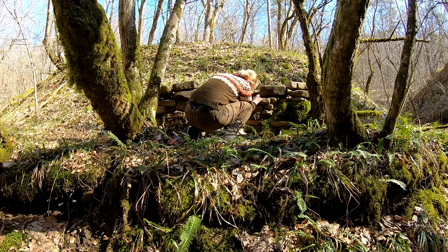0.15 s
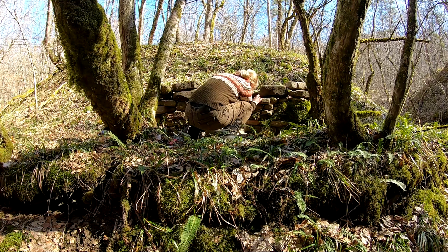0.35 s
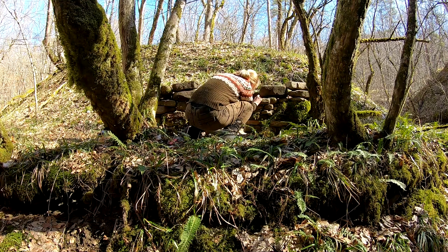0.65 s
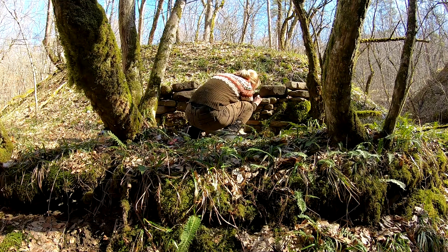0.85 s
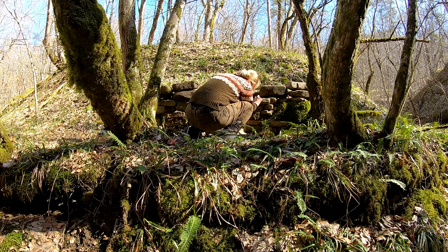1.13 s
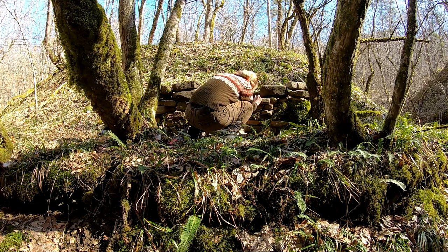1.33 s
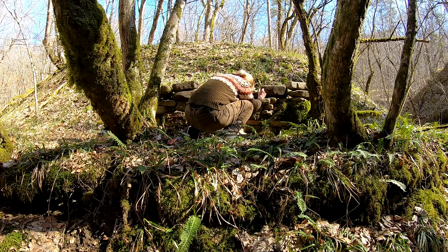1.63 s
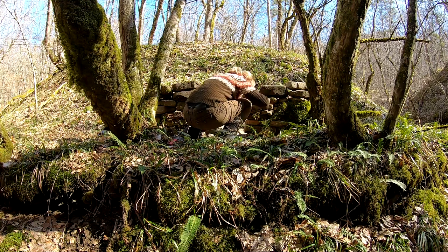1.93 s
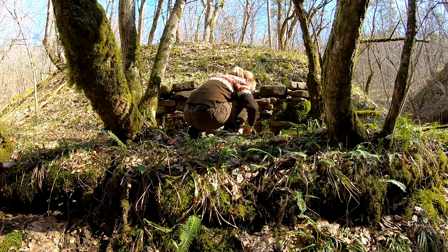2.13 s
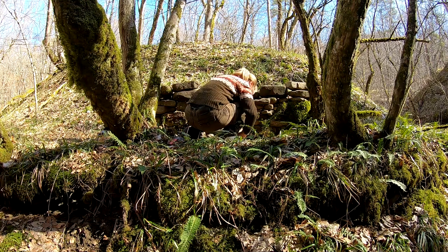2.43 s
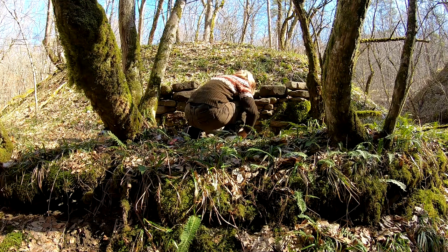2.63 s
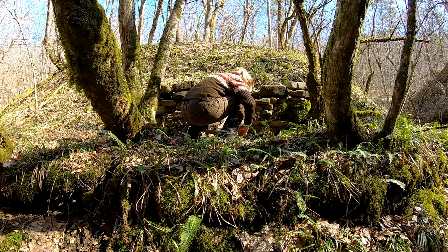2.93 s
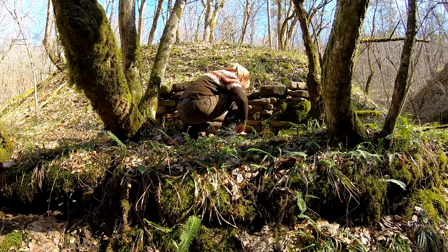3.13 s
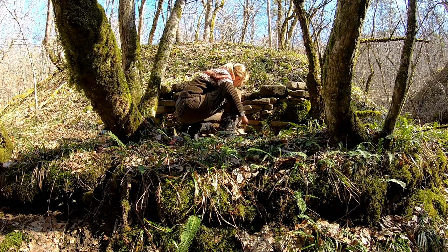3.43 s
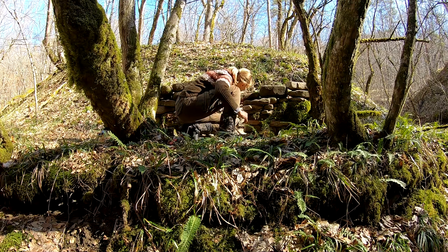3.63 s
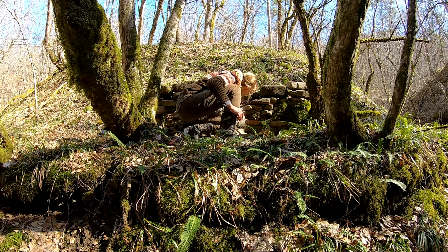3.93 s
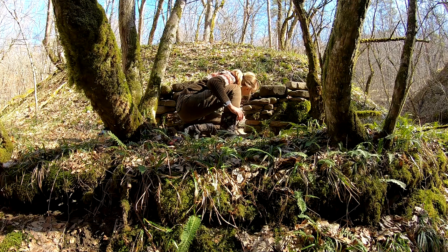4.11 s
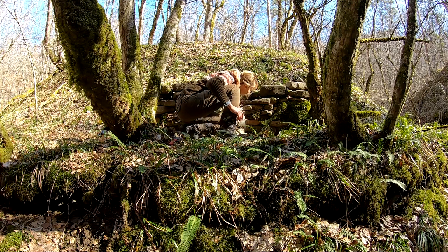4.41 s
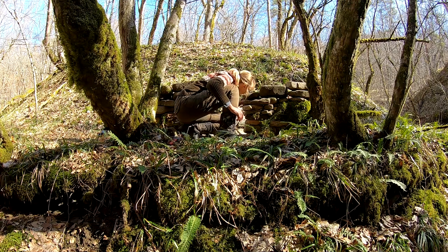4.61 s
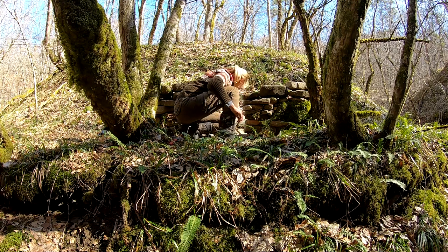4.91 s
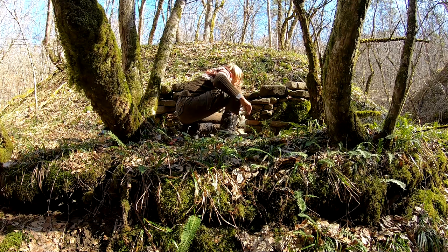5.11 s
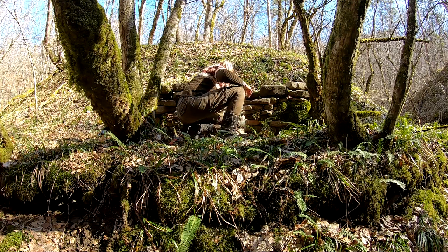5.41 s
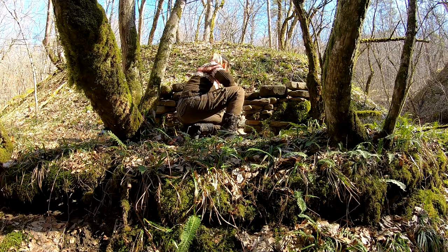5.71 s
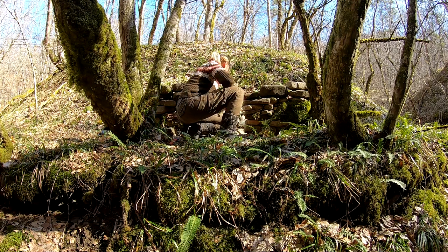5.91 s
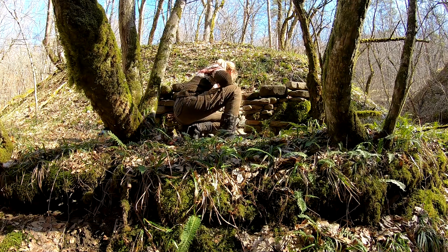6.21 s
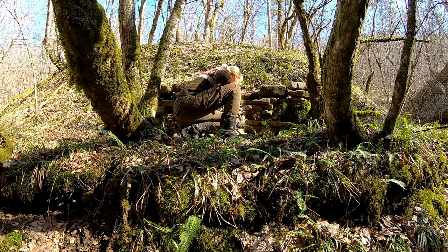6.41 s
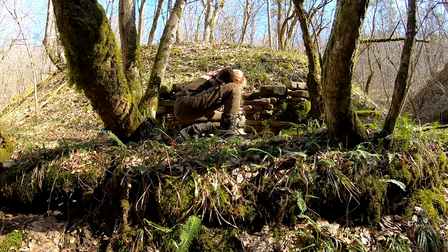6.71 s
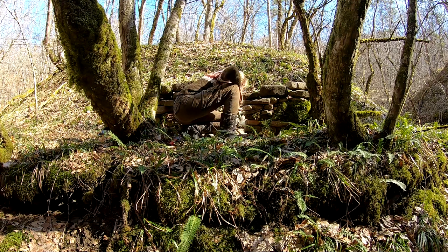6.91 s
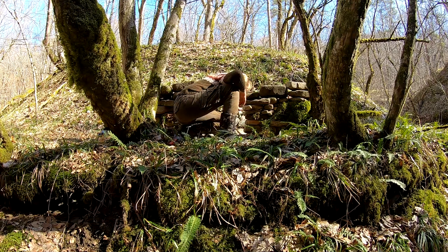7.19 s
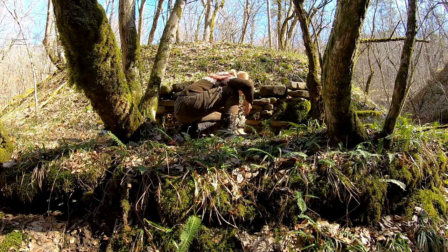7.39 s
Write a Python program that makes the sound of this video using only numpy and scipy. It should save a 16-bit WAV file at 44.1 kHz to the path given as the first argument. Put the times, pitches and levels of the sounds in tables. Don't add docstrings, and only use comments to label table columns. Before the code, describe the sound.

Throughout, a small stream trickles over stones in a wood, close and wide in stereo. Irregular bubbles ring as short bright plinks, drier pops and occasional lower gulps, with fine ticks of droplets, small splashes and a thin fizz of spray rising and falling over a soft distant water wash. Stones and banks give only a very short scatter. A faint low gust touches the microphones near 0.6 s and another near 1.8 s. At 2.2 s a twig snaps, one sharp crack with quick tiny echoes. From 3.1 to 3.5 s a boot drags through dry, crackling leaves. Brisk pops cluster around 3.5 to 3.9 s. Wind thumps begin near 4 s and become frequent, deep and uneven from 4.8 to 6.5 s, shifting between left and right. At 7.2 s a stone settles on moss with a short dull scuff, followed by last low thumps as the water continues.

```python
import sys
import numpy as np
from scipy import signal
from scipy.fft import next_fast_len
from scipy.io import wavfile
from scipy.ndimage import uniform_filter1d

SR = 44100
rng = np.random.default_rng(int(sys.argv[2]) if len(sys.argv) > 2 else 0)


def put_to_file(sound):
    columns = np.atleast_2d(sound).T
    safe = np.clip(columns, -1, 1)
    whole_steps = np.round(safe * 32767)
    wavfile.write(sys.argv[1], SR, whole_steps.astype(np.int16))


def invert_db(x):
    u = np.asarray(x, float) / 20
    return 10 ** u


N = 332955

# [t/s, peak level/dB, f/Hz]
GLUGS = [(0.0289, -35, 3630), (.1397, -39.5, 2080), (.2245, -45.5, 710), (.28, -42.5, 2390),
         (0.4632, -45, 1010), (0.604, -36, 3050), (0.654, -35, 3630), (0.7621, -42.5, 1076),
         (1.0376, -47, 658), (1.272, -38, 3080), (1.663, -40, 2240), (1.717, -43, 1153),
         (1.7859, -43.5, 689), (2.649, -45, 2190), (2.669, -45, 2510), (3.0532, -40.5, 1031),
         (3.7789, -45, 770), (3.881, -44.5, 1190), (4.7787, -43.5, 640), (4.873, -45.5, 1010),
         (5.105, -37.5, 1724), (5.2407, -29, 3025), (5.3688, -39.5, 1760), (5.492, -39.5, 1467),
         (5.5524, -40, 1100), (5.6548, -44, 1018), (5.8225, -44.5, 1300), (6.0297, -37, 3080),
         (6.578, -40, 1350), (7.177, -37.5, 3370)]
# [t/s, peak level/dB, f/Hz]
PLINKS = [(0.094, -36.5, 2610), (0.154, -37.5, 1197), (0.323, -37.5, 3400), (0.4687, -38, 2200),
          (0.591, -38, 2460), (0.728, -40.5, 1194), (.7832, -36, 3650), (0.954, -36, 2800),
          (1.242, -38, 2570), (1.344, -41.5, 1210), (1.3883, -43, 706), (1.391, -36, 1243),
          (1.73, -35, 4190), (2.0686, -34.5, 1070), (2.1636, -35, 3020), (2.3874, -40, 1610),
          (2.753, -45, 930), (2.7747, -37, 1720), (2.918, -43.5, 663), (3.664, -34, 4030),
          (5.082, -30, 2520), (5.19, -41.5, 605), (5.272, -30.5, 4060), (5.941, -39.5, 1073),
          (6.128, -33.5, 2670), (6.357, -39, 3600), (6.706, -37, 2130), (7.0757, -43.5, 916),
          (7.109, -35.5, 3650), (7.271, -37, 2490)]
# [t/s, peak level/dB, f/Hz]
POPS = [(0.0, -38, 1210), (0.2744, -30, 2200), (0.4438, -30.5, 2590), (1.462, -35, 1770),
        (1.4775, -33.5, 2680), (1.4847, -40, 612), (1.6414, -31, 3850), (1.732, -33.5, 2290),
        (1.978, -34.5, 3800), (2.2926, -32.5, 2500), (3.522, -27.5, 1465), (3.53, -31.5, 4160),
        (3.6116, -29, 4030), (3.6467, -25.5, 2800), (3.6814, -32, 3870), (3.8694, -31, 4100),
        (4.1958, -34.5, 2130), (4.638, -32, 3500), (4.8466, -32, 2760), (5.052, -32, 2530),
        (5.3533, -34, 4100), (5.4543, -33.5, 3250), (5.5914, -29.5, 1980), (5.7454, -34, 2800),
        (5.9, -28, 2950), (6.105, -35, 1570), (6.2993, -34.5, 1350), (6.4182, -34, 1610), (7.264, -38, 880),
        (7.4258, -29, 3760)]
# [t/s, peak level/dB, f/Hz]
GULPS = [(.535, -48.5, 696), (0.699, -58.5, 466), (1.3644, -44, 610), (1.5151, -48, 598),
         (1.8862, -52, 488), (2.07, -50, 593), (2.696, -46.5, 640), (3.141, -40, 1072), (3.472, -48, 608),
         (3.53, -49, 592), (4.462, -48, 626), (4.69, -53.5, 627), (4.965, -46, 613), (5.9, -53, 595),
         (5.99, -55, 572), (6.07, -69, 604), (6.742, -46.5, 646), (6.9, -49, 1017)]
# [t/s, peak level/dB, f/Hz]
BLIPS = [(0.1493, -44, 3740), (0.2105, -45, 3320), (0.2135, -46.9, 2720), (0.24, -49.5, 1100),
         (0.6145, -47, 2480), (0.996, -44, 3230), (1.132, -43.5, 3000), (1.1823, -42.5, 2670.0),
         (1.2686, -49, 1421), (1.2908, -47.5, 639), (1.315, -44.5, 1750), (1.4426, -43.5, 3700),
         (1.5947, -44.5, 2400), (1.658, -46, 2800), (1.7595, -45, 2170), (1.7949, -48, 676),
         (1.8142, -44.5, 2860), (2.0874, -43.5, 1670), (2.2184, -44, 1630), (2.791, -46.5, 1204),
         (2.8948, -45.5, 4221), (3.1034, -43.5, 3830.0), (3.4714, -44.5, 1280), (3.5424, -43, 3300),
         (3.6288, -43, 3740), (3.6881, -45.3, 2770), (3.748, -46, 1700), (4.024, -46, 2090),
         (4.031, -42.5, 3420), (4.4765, -44, 2240), (4.567, -46, 3488), (4.8835, -44, 1500),
         (5.3604, -45, 2320), (5.4123, -47.5, 1800), (5.684, -46.2, 2800), (5.735, -46, 1770),
         (5.925, -43.5, 2210), (6.0521, -47, 2260.0), (6.2138, -45.5, 1600), (6.326, -46, 3100),
         (6.401, -47, 1245), (6.885, -47.5, 1026), (7.0741, -45, 2060), (7.138, -46, 2326),
         (7.2551, -45, 3210.0), (7.3146, -47.5, 1760), (7.377, -43.1, 1840), (7.3854, -45, 2550),
         (7.4704, -44.5, 2580), (7.4959, -44.5, 1414), (7.5218, -49.5, 648), (7.522, -47, 1250.0)]
# [t/s, peak level/dB, f/Hz]
PIPS = [(0.196, -43, 1570), (0.2653, -43.5, 1330), (0.3363, -45.5, 1170), (0.3565, -43, 1360),
        (0.433, -42, 1390), (0.5021, -44, 1830), (0.744, -39, 2110.0), (0.9312, -45.5, 1410),
        (1.1037, -40.5, 2540), (1.1364, -44, 1180), (1.5317, -42.5, 2000), (1.547, -41, 2690.0),
        (1.577, -44, 1134), (1.812, -46, 1030.0), (1.9197, -40.5, 2690.0), (2.0508, -41, 3360),
        (2.0577, -42.5, 1850.0), (2.4642, -39, 3760), (2.503, -44.5, 1430), (2.8178, -42.5, 3550),
        (3.03, -39.5, 2690.0), (3.08, -48, 1760), (3.6466, -41, 3700), (3.7817, -41, 2200),
        (3.8311, -40.5, 4000), (4.2151, -41.5, 2210), (4.3137, -46, 1740), (4.3815, -40, 3402),
        (4.447, -40, 3550), (4.4534, -46, 1480), (4.621, -45, 1590.0), (4.716, -43, 1290),
        (4.808, -43, 1290), (4.91, -41, 2050), (5.115, -43, 2260), (5.1908, -44, 1740),
        (5.532, -48.0, 1130), (5.574, -45, 2150), (5.5798, -46, 1430), (5.6968, -42, 2320),
        (5.8792, -48, 744), (6.01, -41, 1350), (6.135, -40.5, 1830), (6.354, -43, 1730), (6.4284, -50, 790),
        (6.7054, -39.5, 2930), (6.7774, -41.5, 1640), (7.1914, -47.5, 718), (7.2, -43, 2600),
        (7.3972, -39, 2100), (7.4029, -45, 1590), (7.4858, -39, 1990), (7.5344, -47, 680)]
# [t/s, peak level/dB, f/Hz]
TICKS = [(0.0066, -45.5, 5280), (0.324, -41.5, 4770), (0.420, -47.5, 7600), (0.521, -44, 4970.0),
         (0.6156, -48, 4460), (1.155, -49, 6560), (1.2412, -44.5, 8000), (1.4609, -47, 9000),
         (1.618, -44.5, 8550.0), (1.783, -45, 8000), (1.888, -46, 8530.0), (2.8786, -47, 6050.0),
         (3.0052, -44.5, 5770.0), (3.0602, -46, 7730.0), (3.0948, -44, 7060), (3.109, -42, 7950.0),
         (3.516, -49, 5170), (3.5653, -45, 8500), (3.611, -45, 6440), (3.6462, -44, 4640),
         (3.8251, -48, 8030.0), (3.8471, -44, 6400), (4.0402, -44, 8100), (4.0946, -43.5, 4570),
         (4.33, -43, 8500), (4.5218, -43, 9090.0), (4.681, -44, 4640), (4.7287, -43, 8650),
         (4.7475, -43.5, 4570), (4.777, -42, 8060), (4.812, -41.5, 6430), (5.0721, -42.5, 6830.0),
         (5.219, -46, 4370), (5.6867, -46, 4660), (6.015, -45.5, 5080.0), (6.1394, -46, 5490.0),
         (6.312, -52, 3880), (6.5658, -44, 8160.0), (6.864, -46, 8900), (6.8755, -44, 5430.0),
         (7.081, -43.5, 8700), (7.217, -39.5, 8440), (7.2497, -41.5, 6530), (7.272, -40.5, 6850),
         (7.5412, -40.5, 7320)]
GLUG_CYCLES, PLINK_CYCLES, POP_CYCLES, GULP_CYCLES = 17.9, 10.8, 4.36, 10.5
BLIP_CYCLES, PIP_CYCLES, TICK_CYCLES = 11.3, 6.2, 6.9
# [f/Hz, level/dB]
CROWD_SPECTRUM = [(530, -17), (645, 0), (820, -5), (1280, 4), (2500, 5), (4000, 9), (6000, -15),
                  (9000, -10)]
LOUDEST_CROWD = 1.1

# [t/s, peak level/dB, centre f/Hz, left over right/dB]
SPLASHES = [(0.12, -57.5, 4830, -1.5), (0.188, -64.5, 8050, -13), (0.269, -56, 7620, 0),
            (0.325, -63, 4300, 0.0), (0.559, -62, 8100, -20), (0.655, -62, 4500, 0.5),
            (0.6944, -61, 6340, -1.5), (0.811, -61, 6300, -11), (1.155, -61, 4760, 0.0),
            (1.3246, -61.5, 7200, -11), (1.756, -62, 9200, -2.0), (2.5103, -50.5, 4160, -28),
            (2.557, -60, 4540, 2), (2.8457, -53, 5120, -4), (3.218, -49, 4350, 8), (3.5275, -59, 4270, -9),
            (3.87, -48, 4200, -4), (3.909, -53, 4920, -0.5), (4.0938, -65, 4540, -1.0),
            (4.522, -56, 4300, -2.0), (4.636, -59, 4030, -15), (4.9532, -53, 4070, -13),
            (5.017, -60.5, 7500, -3), (5.3513, -61, 4360, -6), (5.719, -59, 8250, -13),
            (5.898, -60, 6900, -6), (6.106, -53, 4000, -16), (6.475, -54, 8100, -15),
            (6.631, -57.5, 4290, -19), (7.35, -53, 4950, 4)]
# [t/s, crest level/dB, fade/s]
SURGES = [(0, -59, 0.38), (.28, -53.5, 0.022), (.55, -57, 0.38), (1.3, -60, 1), (1.76, -53.5, 0.12),
          (1.9, -53.5, 0.082), (2.55, -53.5, 0.077), (2.85, -58.5, 0.27), (3.1, -50, 0.024),
          (3.5, -52, 0.28), (3.88, -59, 1), (4.58, -52.5, 0.26), (5.3, -56.5, 0.32), (6.13, -54.5, 0.047),
          (6.5, -58, 0.31), (6.87, -57, 1)]
LULL_DB, SURGE_RISE_S = -66, 0.039
# [f/Hz, level per Hz/dB]
FIZZ_SPECTRUM = [(1500, 8), (3000, 0), (6000, -4.5), (8400, -2.5), (9300, -6), (11200, -23), (14300, -27),
                 (15500, -29)]
BANK_DB, BANK_T60_S = -11, 0.05

# [t/s, peak level/dB]
TWIG = [
    (2.199, -22),
    (2.2011, -32.5),
    (2.2028, -31.5),
    (2.2053, -34),
    (2.2075, -40),
]
# [t/s, level/dB]
SCUFFS = [
    [(3.04, -62), (3.1, -66), (3.16, -53), (3.21, -45.5), (3.26, -48.5), (3.31, -45.5), (3.38, -49),
     (3.43, -55.5), (3.49, -74)],
    [(7.16, -55), (7.195, -46), (7.23, -66)],
]
# [f/Hz, level per Hz/dB]
LEAVES_SPECTRUM = [(150, -13), (500, -5.5), (1100, 2.5), (3000, 4.5), (6700, -0.5), (10400, -6),
                   (11200, -18), (13900, -18), (15500, -29)]
# [f/Hz, level per Hz/dB]
MOSS_SPECTRUM = [(71, -64), (120, -4), (190, 6), (840, -22), (1190, -2), (3700, 0), (12000, -57),
                 (15600, -80), (22000, -120)]

# [t/s, length/s, level on arrival/dB, level on leaving/dB]
GUSTS = [(.05, .1, -79, -75), (.45, 0.028, -61, -77), (0.572, 0.2, -48, -63), (1.742, 0.28, -47.5, -69),
         (2.147, .04, -60, -70), (3.96, 0.49, -63, -61), (4.715, 0.045, -57, -70),
         (4.856, 0.67, -42, -53.5), (5.669, 0.27, -48.5, -44.5), (6.046, 0.15, -51, -44.5),
         (6.343, 0.29, -42.5, -66), (6.55, 0.43, -51.5, -56), (7.134, 0.5, -48, -51.5)]
GUST_RISE_S, GUST_FALL_S, STILL_DB = 0.18, 0.19, -110
# [t/s, left peak level/dB, right peak level/dB, f/Hz]
THUMPS = [(.611, -52, -41, 23.6), (3.988, -48, -36.5, 27.8), (4.168, -32, -39, 24.8),
          (4.279, -43, -44, 22.6), (4.848, -44, -30, 61), (4.873, -28.5, -37, 34.3),
          (4.909, -40, -22.5, 47), (4.968, -37, -39, 24.7), (5.026, -29.5, -43, 33), (5.062, -25, -32, 30),
          (5.114, -34.5, -33, 33.8), (5.289, -29, -49, 30.8), (5.355, -31, -59, 36.3),
          (5.472, -33, -25.5, 36), (5.512, -28.5, -34, 42), (5.724, -70, -36.5, 21.8),
          (5.803, -27.5, -71, 121), (5.821, -25, -37, 65), (5.91, -27, -42, 35.3), (6.05, -29, -28.5, 39),
          (6.081, -39, -32.5, 54.6), (6.121, -40, -33, 39.2), (6.154, -27.5, -32, 23.9),
          (6.293, -38.5, -36, 39), (6.332, -32, -47, 45.3), (6.364, -28, -43, 49.7),
          (6.417, -42, -36, 33.6), (7.229, -30, -44, 31.2), (7.327, -23, -60, 47.5)]
EDDY_CYCLES = 0.57

# [f/Hz, level per Hz/dB]
WASH_SPECTRUM = [(35, -39), (60, 9), (100, -19), (167, 6), (359, -8.5), (485, -11.5), (650, 4), (820, -2),
                 (1170, 2), (2150, 0.5), (2980, -3.5), (3190, -0.5), (5200, -15), (9080, -16.5),
                 (15500, -56)]
WASH_DB = -58
# [f/Hz, side over mid/dB]
WIDTH = [(60, -42), (120, 3.5), (240, 1), (480, -2.5), (950, -1), (1890, -7), (3770, -5), (7520, -6),
         (15000, -9)]
# [f/Hz, gain/dB]
SIDE_LIFT = [(2000, 2), (4000, -3), (7000, 8), (12000, 7.5)]
EDGE_HZ = 15600


def evened(x):
    return x / np.sqrt(np.mean(x ** 2) + 1e-20)


def read(points, hz):
    f, value = np.transpose(points)
    return np.interp(np.log(hz + 1), np.log(f + 1), value)


def curve(rows):
    s, *columns = np.transpose(rows)
    return [np.interp(np.arange(N) / SR, s, column) for column in columns]


def spell(rows):
    first, last = rows[0], rows[-1]
    before = [(first[0] - 0.03, -95, *first[2:])]
    after = [(last[0] + 0.054, -95, *last[2:])]
    return curve(before + rows + after)


def colour(x, points):
    hz = abs(np.fft.fftfreq(4096, 1 / SR))
    log_gain = np.log(invert_db(np.maximum(read(points, hz), -100)))
    taps = np.fft.ifft(np.exp(np.conj(signal.hilbert(log_gain)))).real[:2048]
    return signal.oaconvolve(x, taps[None], axes=1)[:, :N]


def scatter(s, grains, side):
    starts = np.round(s * SR).astype(int)[:, None]
    at = (starts + np.arange(grains.shape[1])).ravel()
    return np.array([np.bincount(at, g.ravel(), N)[:N] for g in (grains, grains * side[:, None])])


def lean(pan_db):
    return np.tanh(pan_db * np.log(10) / 40)


def apart(pair):
    mid, side = pair
    return np.array([mid, signal.hilbert(side, next_fast_len(N)).imag[:N]])


def ring(db, hz, cycles, rise, size):
    turns = hz[:, None] * np.arange(size) / SR
    age = turns / np.maximum(cycles, 1)[:, None]
    swell = np.clip(turns / (1.7 + 0.14 * cycles[:, None]), 0, 1)
    shape = np.sin(np.pi / 2 * swell) ** 2 * np.exp(-age - 0.05 * age ** 2)
    return invert_db(db)[:, None] * shape * np.sin(2 * np.pi * turns * (1 + rise[:, None] * age))


def bubbles():
    s, db, hz = np.transpose(GLUGS + PLINKS + POPS + GULPS)
    counts = [len(GLUGS), len(PLINKS), len(POPS), len(GULPS)]
    cycles = np.repeat([GLUG_CYCLES, PLINK_CYCLES, POP_CYCLES, GULP_CYCLES], counts)
    luck = rng.random((len(s), 2))
    grains = ring(db - 0.5, hz, cycles, 0.058 * luck[:, 0], size=1600)
    grains += ring(db - 3.0, 1.78 * hz, 0 * hz, 0 * hz, size=1600)
    side = 0.83 * (2 * luck[:, 1] - 1) * invert_db(read(WIDTH, hz))
    return apart(scatter(s, grains, side))


def trickle():
    s, db, hz = np.transpose(BLIPS + PIPS)
    cycles = np.repeat([BLIP_CYCLES, PIP_CYCLES], [len(BLIPS), len(PIPS)])
    luck = rng.random((len(s), 2))
    grains = ring(db + 3.0, hz, cycles, 0.073 * (luck[:, 0] - 0.3), size=1600)
    side = 0.91 * (2 * luck[:, 1] - 1) * invert_db(read(WIDTH, hz))
    return apart(scatter(s, grains, side))


def crowd(low_hz, high_hz, db, spread_db, cycles, count, size):
    luck = rng.random((count, 8))
    hz = low_hz * (high_hz / low_hz) ** luck[:, 0]
    loudness = np.minimum(-np.log(luck[:, 1]), LOUDEST_CROWD)
    db = db + read(CROWD_SPECTRUM, hz) + spread_db * loudness
    grains = ring(db, hz, cycles * (0.27 + luck[:, 2] ** 2), 0.1384 * (luck[:, 3] - 0.2), size=size)
    starts = np.transpose(GLUGS + PLINKS + POPS)[0]
    leader = starts[(luck[:, 6] * len(starts)).astype(int)]
    in_wake = leader - 0.018 * np.log(luck[:, 4])
    anywhere = luck[:, 4] * N / SR
    s = np.where(luck[:, 7] < 0.3, in_wake, anywhere)
    side = 1.33 * (2 * luck[:, 5] - 1) * invert_db(read(WIDTH, hz))
    return apart(scatter(s, grains, side))


def gurgle():
    tiny = crowd(1750, 10280, -61.5, 8.75, 5.7, count=6500, size=260)
    large = crowd(520.4, 2661, -57.0, 3.35, 10.5, count=2300, size=750)
    return large + tiny * invert_db(0.5 * (splatter() + 55.5))


def splashes():
    s, db, hz, pan_db = np.transpose(SPLASHES)
    t = np.arange(2600) / SR
    tone = np.cos(2 * np.pi * hz[:, None] * t)
    tick = t / 0.00034 * np.exp(1 - t / 0.00033) * tone
    noise = uniform_filter1d(rng.standard_normal((len(s), len(t))), size=5) * tone
    spatter = noise * (invert_db(0.0 - 60 * t / 0.027) + invert_db(-29 - 60 * t / 0.053))
    drops = scatter(s, invert_db(db)[:, None] * (tick + spatter), lean(pan_db))
    return colour(drops, [(1500, 8), (3500, 11), (9000, 22.0), (10800, -10), (15500, 2)])


def ticks():
    s, db, hz = np.transpose(TICKS)
    t = np.arange(900) / SR
    noise = np.diff(rng.standard_normal((len(s), len(t) + 1)))
    click = noise * (invert_db(-13 - 60 * t / 0.0084) + invert_db(-15 - 60 * t / 0.04))
    side = 1.3 * (rng.random(len(s)) - 0.6)
    strike = scatter(s, invert_db(db)[:, None] * click, side)
    strike = colour(strike, [(2000, -8), (5000, -2.0), (9300, 4.0), (11000, -24), (15500, -24)])
    tone = ring(db + 5.0, hz, TICK_CYCLES + 0 * hz, 0 * hz, size=len(t))
    return scatter(s, tone, side) + strike


def splatter():
    t = np.arange(0, N + 64, 64) / SR
    power = invert_db(2 * LULL_DB)
    for s, db, fade in SURGES:
        power = power + invert_db(2 * db) * np.exp(np.minimum((t - s) / SURGE_RISE_S, (s - t) / fade))
    return np.interp(np.arange(N) / SR, t, 10 * np.log10(power))


def spray():
    out = 0
    for centre_hz in (3630, 6670, 9600, 14000):
        struck = rng.random(N) < 160 / SR
        size = invert_db(6.8 * np.minimum(rng.exponential(1, N), 2.8)) * struck
        burst = signal.lfilter([1], [1, -np.exp(-1 / (0.0019 * SR))], size)
        linger = signal.lfilter([0.12], [1, -np.exp(-1 / (0.026 * SR))], size)
        hiss = (burst + linger) * rng.standard_normal((2, N))
        band = signal.butter(1, [centre_hz * 0.75, centre_hz * 1.12], "band", fs=SR, output="sos")
        out = out + signal.sosfilt(band, hiss) / np.sqrt(centre_hz)
    mid, side = (evened(v) for v in colour(out, FIZZ_SPECTRUM))
    return invert_db(splatter() - 3.0) * np.array([mid, -0.15 * mid + 0.46 * side])


def banks(pair):
    t, out = np.arange(4000) / SR, pair
    for k in range(3):
        noise = rng.standard_normal((2, len(t))) * (rng.random((2, len(t))) < 0.06)
        tail = noise * invert_db(-60 * t / BANK_T60_S) * (t > 0.0015)
        tail = tail / np.linalg.norm(tail[0])
        share = np.sqrt(2 / 3) * np.cos(np.pi * (3.1 * np.arange(N) / SR + k / 3))
        out = out + invert_db(BANK_DB) * signal.oaconvolve(share * pair, tail, axes=1)[:, :N]
    return out


def twig():
    s, db = np.transpose(TWIG)
    t = np.arange(5000) / SR
    since = t - 0.0002
    crack = np.exp(-(since / 0.0001) ** 2) * -np.cos(2 * np.pi * 6800 * since)
    noise = rng.standard_normal((len(s), len(t)))
    tail = noise * (invert_db(-16 - 60 * t / 0.024) + invert_db(-26 - 60 * t / 0.26))
    side = np.array([-0.083, 1.0, -0.93, 0.57, -0.45])
    snaps = scatter(s, invert_db(db)[:, None] * (crack + tail), side)
    return colour(snaps, [(800, -15), (2500, -5), (4000, 6.5), (9000, 1.5), (10800, -18), (15500, -25)])


def scuffs():
    breaks = 40 * invert_db(2.6 * rng.exponential(1, N)) * (rng.random(N) < 120 / SR)
    crackle = 1 + 0.5 * uniform_filter1d(breaks, size=40)
    out = 0
    for rows, spectrum in zip(SCUFFS, (LEAVES_SPECTRUM, MOSS_SPECTRUM)):
        mid, side = (evened(v) for v in colour(crackle * rng.standard_normal((2, N)), spectrum))
        out = out + invert_db(spell(rows)[0]) * np.array([mid, 0.28 * side])
    return out


def wind():
    large, medium = evened(lumps(10.7, 51.7)), evened(lumps(23, 139))
    out = invert_db(-81.0) * large + thumps()
    for s, length, come_db, go_db in GUSTS:
        end = s + length
        level_db = curve([(s - GUST_RISE_S, STILL_DB), (s, come_db),
                          (end, go_db), (end + GUST_FALL_S, STILL_DB)])[0]
        medium_db = -10.0 + 2.15 * (level_db + 45.0)
        out = out + invert_db(level_db) * (large + invert_db(medium_db) * medium)
    return out


def lumps(low_hz, high_hz):
    band = signal.butter(2, [low_hz, high_hz], "band", fs=SR, output="sos")
    x = signal.sosfilt(band, rng.standard_normal((2, N)))
    strength = np.sqrt(abs(uniform_filter1d(x ** 2, size=2600, axis=1))) + 1e-9
    return signal.sosfiltfilt(band, x / strength)


def thumps():
    s, left_db, right_db, hz = np.transpose(THUMPS)
    half = 3000
    turns = hz[:, None] * (np.arange(2 * half) - half) / SR
    shape = np.exp(-abs(turns / EDDY_CYCLES) ** 1.5)
    phase = rng.random((len(s), 2, 1))
    ports = []
    for k, db in enumerate((left_db, right_db)):
        swings = invert_db(db)[:, None] * shape * np.cos(2 * np.pi * (turns + phase[:, k]))
        ports.append(scatter(s - half / SR, swings, s)[0])
    return np.array(ports)


def wash():
    frames, hz = N // 256 + 5, np.fft.rfftfreq(1024, 1 / SR)
    a, b, c, d, patches = rng.standard_normal((frames, 513, 5)).T
    patches = uniform_filter1d(uniform_filter1d(patches, size=10, axis=0), size=4, axis=1)
    patchy_db = read([(300, 2.4), (900, 4.7), (9000, 4.25)], hz)[:, None]
    flicker = evened(uniform_filter1d(rng.standard_normal(frames), size=5))
    flicker_db = 1.87 * flicker * (hz > 450)[:, None]
    level_db = read(WASH_SPECTRUM, hz)[:, None] + patchy_db * evened(patches) + flicker_db
    z = np.array([a + 1j * b, (c + 1j * d) * invert_db(read(WIDTH, hz))[:, None]])
    mid, side = signal.istft(z * invert_db(level_db), nperseg=1024, noverlap=768)[1][:, :N]
    return invert_db(WASH_DB) * np.array([mid, side]) / np.std(mid)


def scene():
    water = banks(bubbles() + gurgle() + splashes() + trickle() + ticks())
    mid, side = water + twig() + spray() + wash() + scuffs()
    side = colour(side[None], SIDE_LIFT)[0]
    return np.array([mid + side, mid - side]) + wind()


def low_pass(x):
    return signal.sosfilt(signal.butter(12, 15710, fs=SR, output="sos"), x)


def record(dry):
    limited = signal.oaconvolve(dry, signal.firwin(301, EDGE_HZ, fs=SR)[None], "same")
    return low_pass(limited)


dry = scene()
out = record(dry)
put_to_file(out)
```